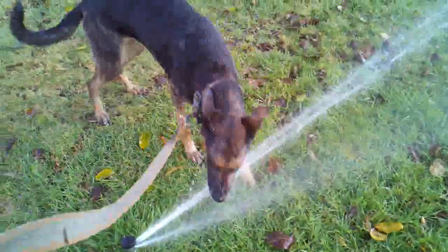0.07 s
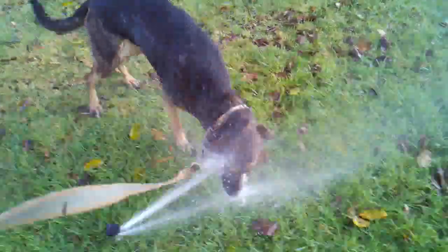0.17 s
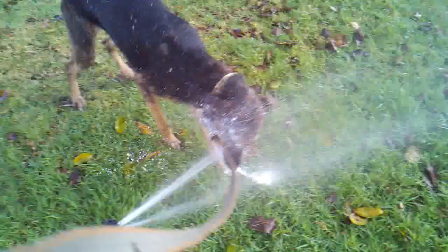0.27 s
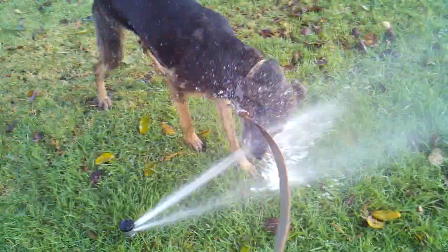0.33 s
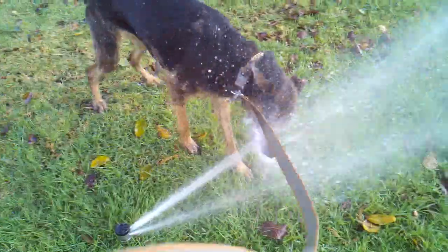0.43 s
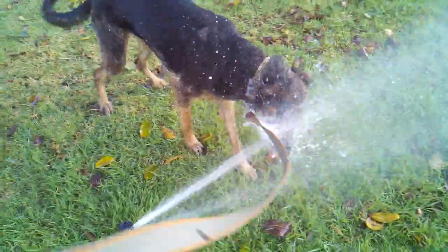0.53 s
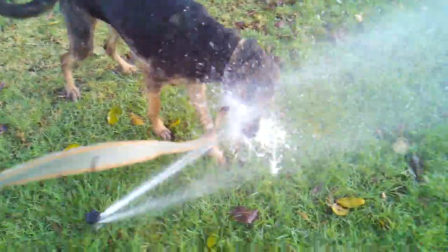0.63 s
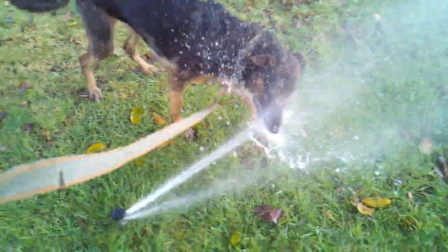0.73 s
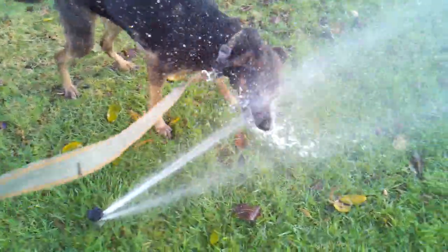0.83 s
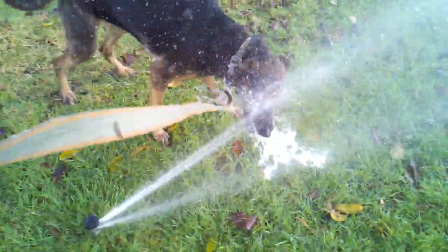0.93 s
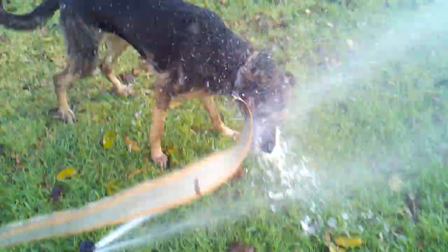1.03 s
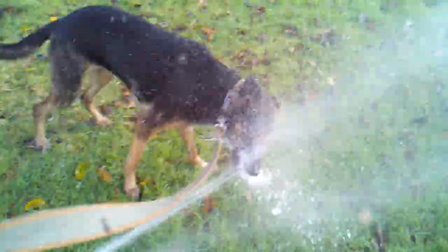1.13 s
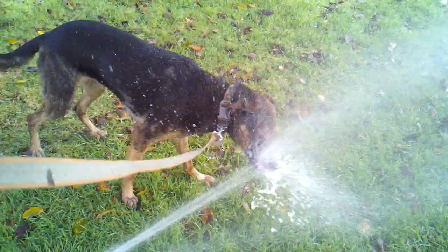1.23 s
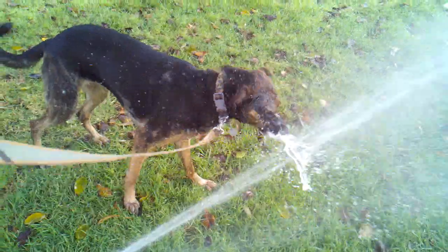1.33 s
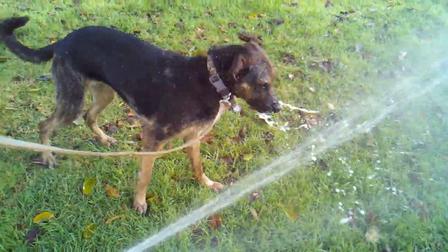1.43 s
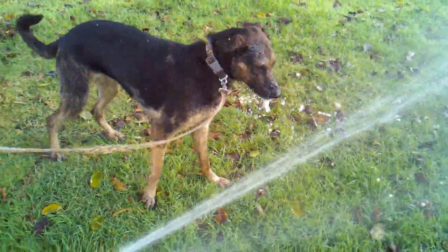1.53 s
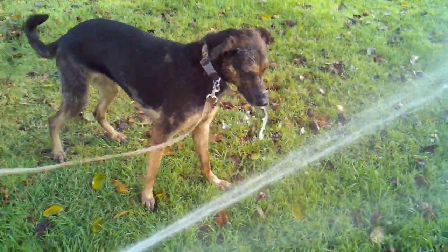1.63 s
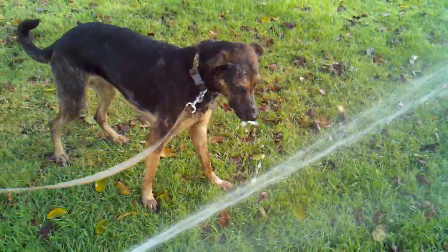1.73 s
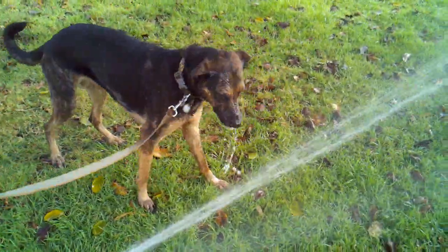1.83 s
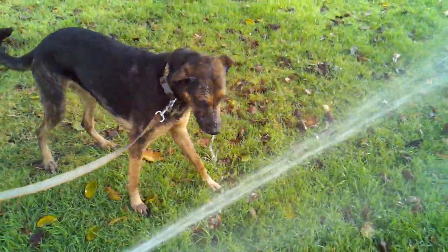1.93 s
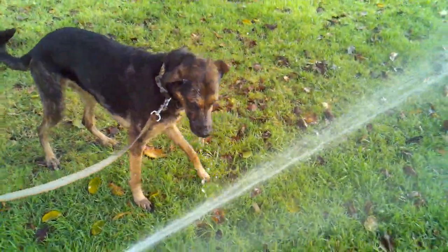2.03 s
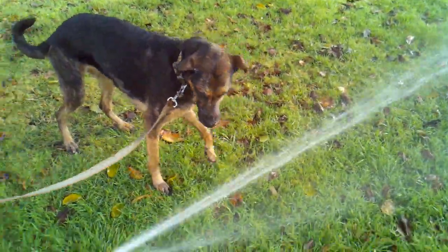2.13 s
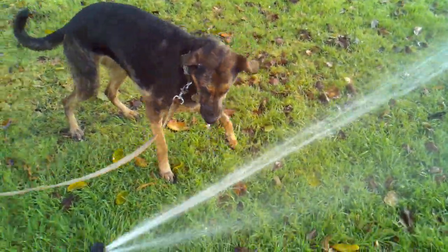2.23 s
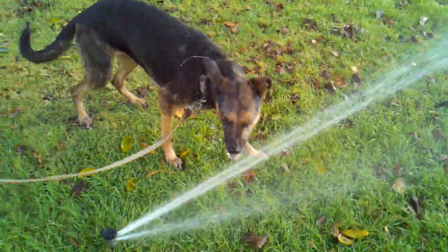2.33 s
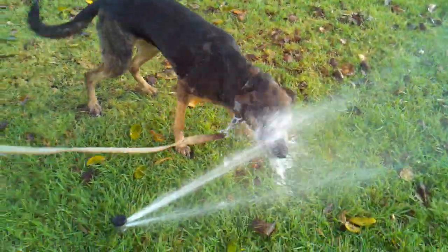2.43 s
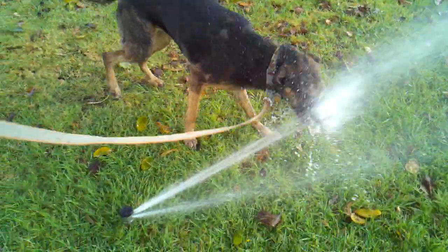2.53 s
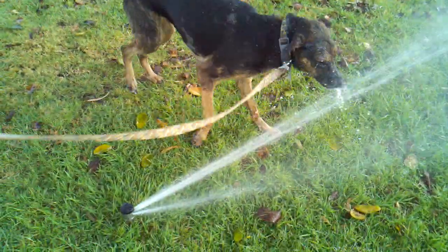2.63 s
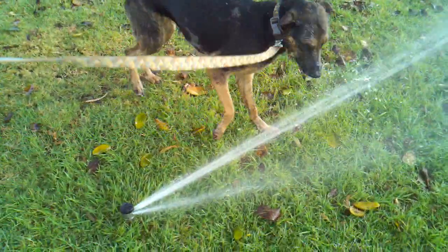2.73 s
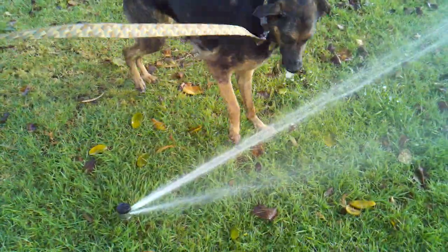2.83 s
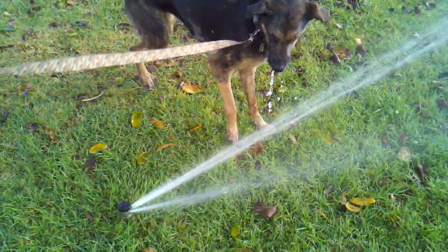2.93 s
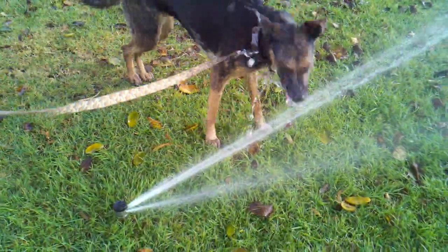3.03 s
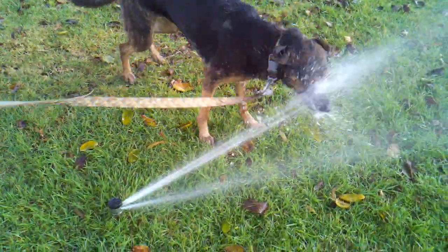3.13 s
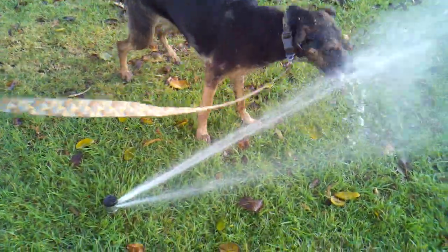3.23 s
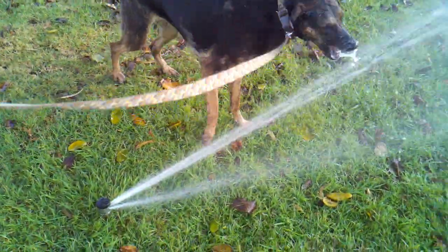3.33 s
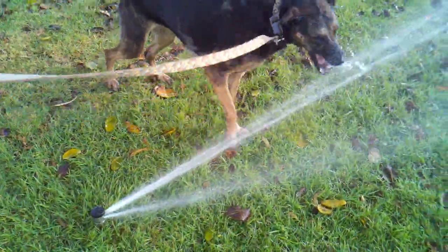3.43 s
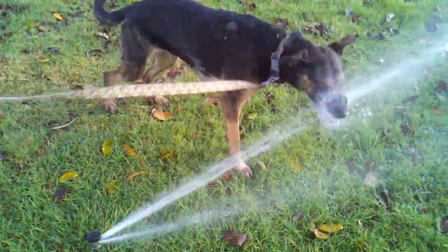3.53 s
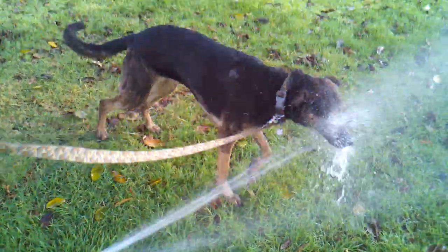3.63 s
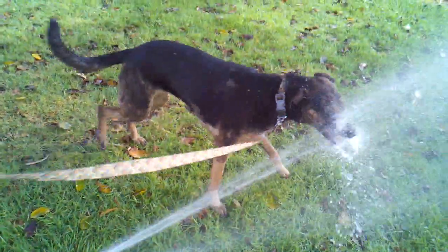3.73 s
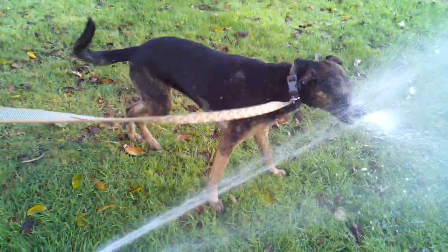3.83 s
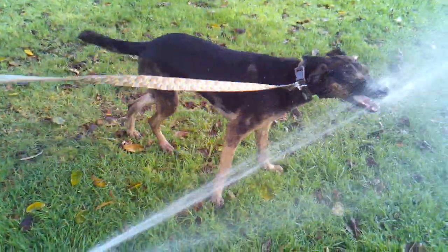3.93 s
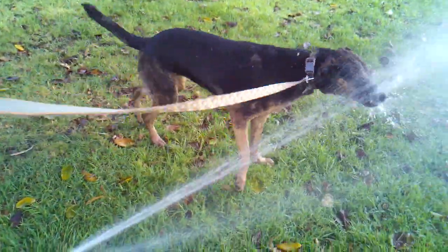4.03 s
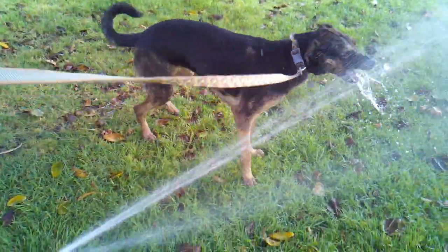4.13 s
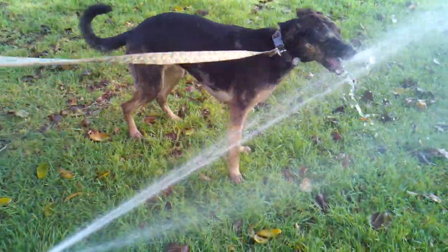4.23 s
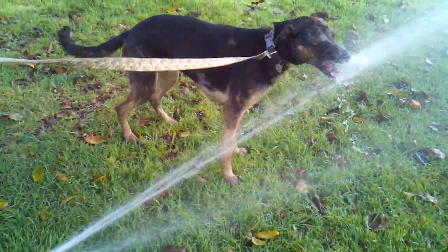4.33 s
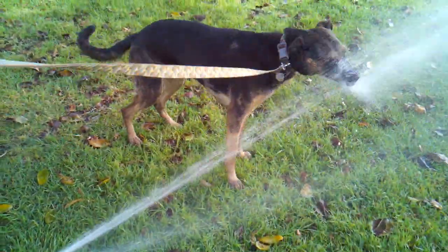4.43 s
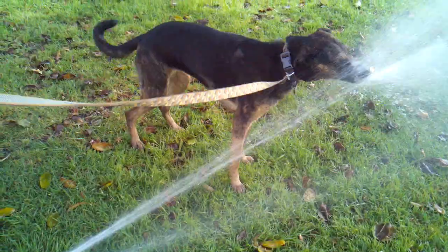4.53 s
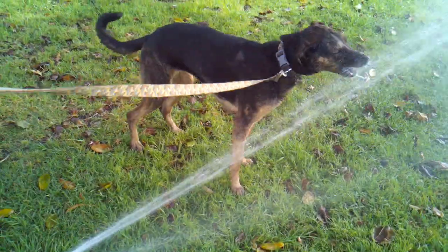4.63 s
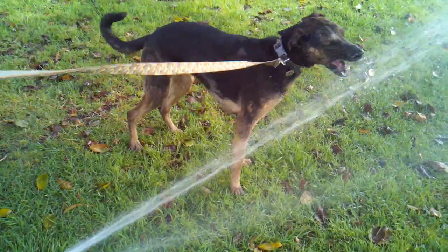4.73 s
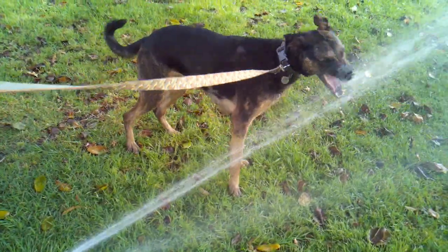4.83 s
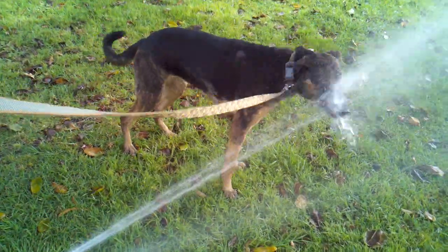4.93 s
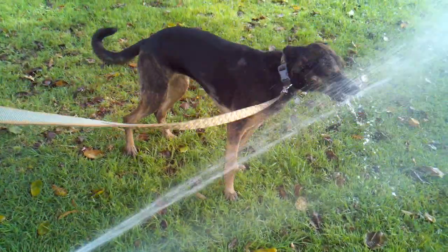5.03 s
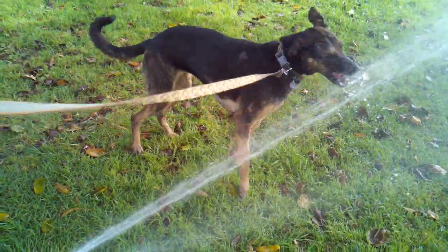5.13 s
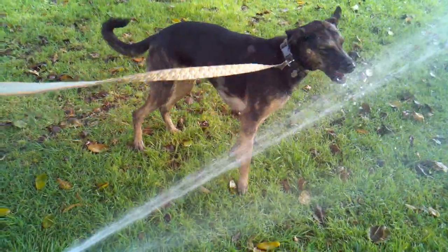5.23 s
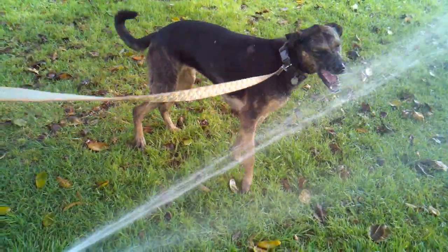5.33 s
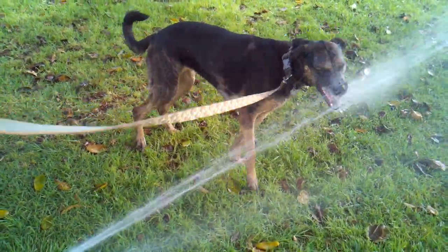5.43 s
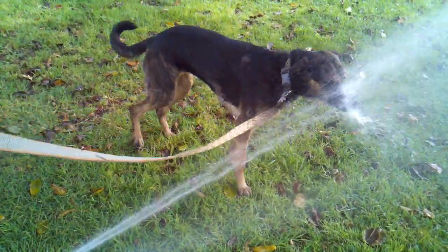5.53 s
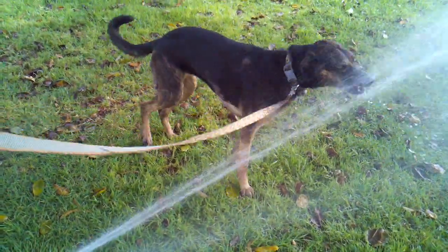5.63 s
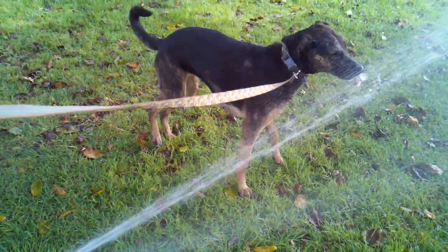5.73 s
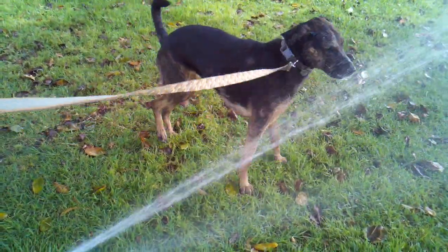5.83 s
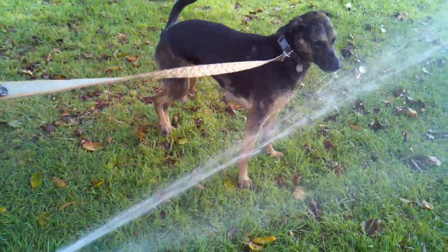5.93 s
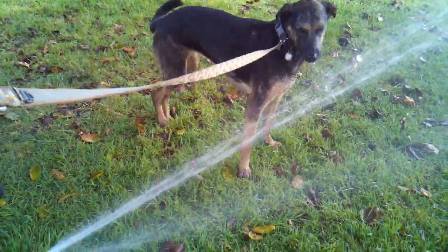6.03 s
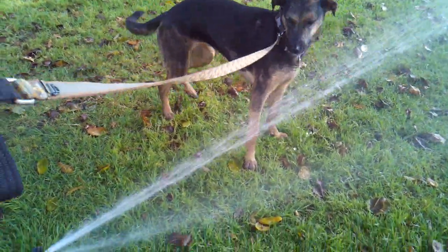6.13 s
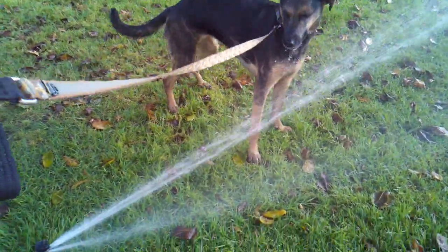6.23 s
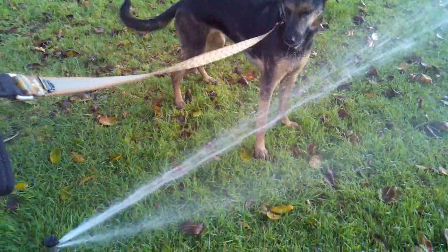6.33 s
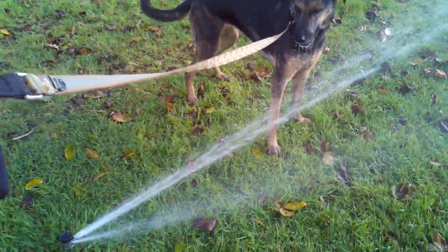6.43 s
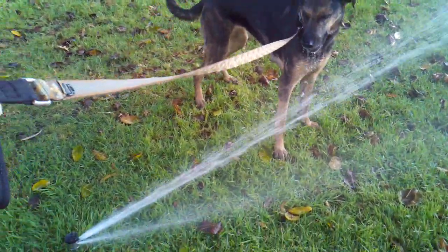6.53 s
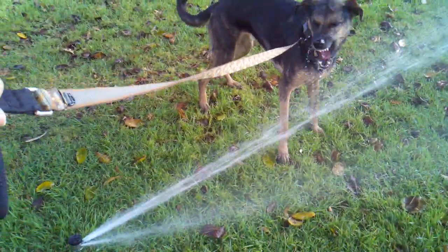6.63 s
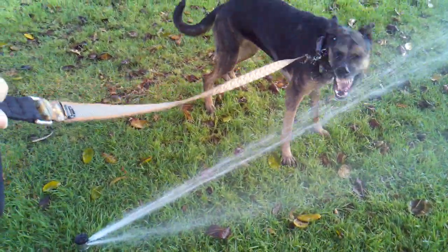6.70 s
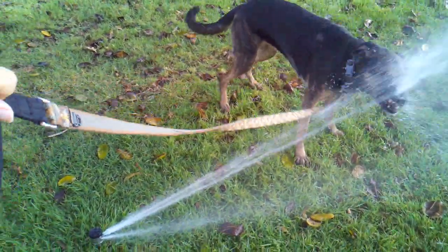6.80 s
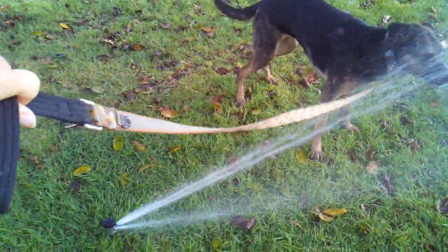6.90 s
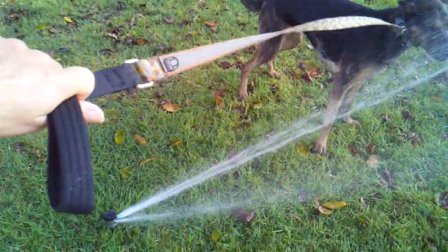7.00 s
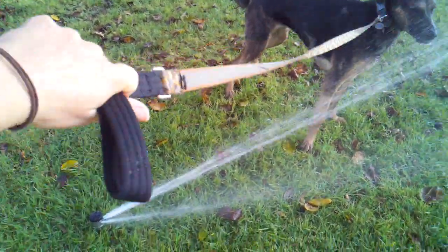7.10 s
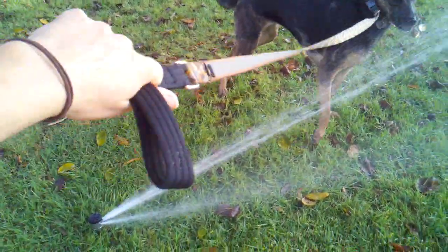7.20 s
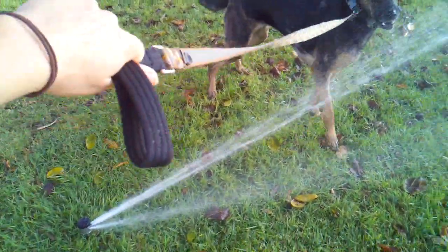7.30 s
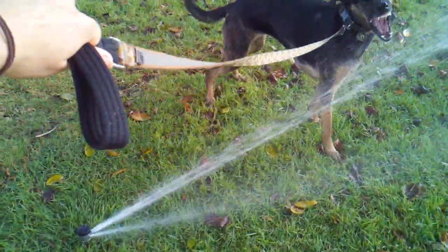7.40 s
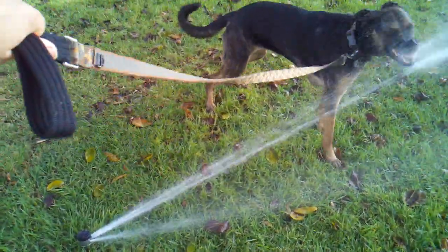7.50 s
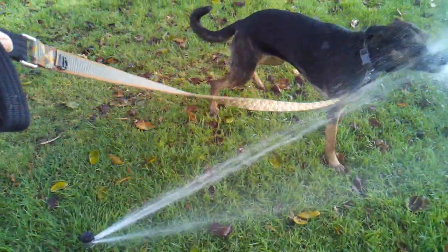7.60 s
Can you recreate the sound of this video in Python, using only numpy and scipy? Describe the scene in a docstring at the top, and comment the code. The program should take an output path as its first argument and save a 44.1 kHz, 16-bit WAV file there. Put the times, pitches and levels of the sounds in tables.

```python
"""A sprinkler jet swells into a hiss (shaped noise, whistle) as an engine (gliding firing tones) slows down.
At once a dog bites the jet, in a run to 1.4 s and again from 2.5 s: noise sprays, drops ring the mouth,
and gulps ring like trapped air. Bumps (short dull swings) hit the hand-held camera, mostly before 3.5 s
and near 7 s. From 1.2 s engines mostly gather speed; from 2.7 s fuzzy notes swell in the noise of traffic.
Two microphone ports hear all this; the camera subtracts each, delayed, from the other for stereo."""
import sys
import numpy as np
from scipy import signal
from scipy.fft import rfft, irfft, next_fast_len
from scipy.io import wavfile
from scipy.ndimage import uniform_filter1d

SR = 44100
rng = np.random.default_rng(int(sys.argv[2]) if len(sys.argv) > 2 else 0)


def unload_wav(signal):
    """Save mono or channel-first audio to the path in sys.argv[1] as 16-bit WAV at rate SR, clipped to [-1, 1]."""
    wavfile.write(
        sys.argv[1],
        SR,
        np.round(np.clip(np.atleast_2d(signal).T, -1, 1) * 32767).astype(np.int16),
    )


N = 337806  # length in samples

# Snaps of the jaws into the jet: [start t/s, hold t/s, spray level/dB as the hold begins, level/dB as it ends,
# gurgle over spray level/dB, mouth cavity f/Hz, extra level/dB of dull splat, extra level/dB of fine mist]
BITES = [(.172, 0.011, -38, -27.5, -13.5, 1100, 1.5, -1), (.225, 0.018, -33, -35, -6.5, 1400, 3, -7),
         (.262, 0.077, -29, -32.5, -14.5, 1000, 2, 0), (.372, 0.11, -31.5, -38.5, -13.5, 920, -0.5, -0.5),
         (.512, 0.041, -27, -30.5, -15.5, 1530, -2, -3), (.592, 0.058, -28.5, -32.5, -11.5, 1420, -0.5, -2),
         (.685, 0.085, -28.5, -29.5, -12.5, 1350, -1.5, -0.5), (.81, 0.088, -26.5, -30, -13, 1400, -3, -1),
         (.935, 0.062, -29, -29, -10, 1420, -2.5, -1), (1.03, 0.084, -30.5, -30, -10.5, 1390, 0.5, -0.5),
         (1.15, 0.075, -28, -26.5, -14, 1110, -4, 0.5), (1.27, 0.088, -30.5, -28.5, -14, 1180, 0, 3),
         (2.462, 0.13, -26, -23.5, -17, 1060, -1.5, 0.5), (2.632, 0.018, -26, -30, -33, 1060, -5, -3.5),
         (3.158, .13, -26, -22, -16.5, 1070, -0.5, -1), (3.63, 0.031, -21, -26.5, -20, 1070, -0.5, -0.5),
         (3.69, 0.25, -29, -27.5, -15.5, 1140, 0, -1.5), (4.02, 0.062, -31.5, -26, -21, 1210, 0.5, 2.5),
         (4.33, 0.16, -40, -41, -10, 944, 3.5, 4.5), (4.505, 0.11, -26, -28, -21, 920, -1, 0.5),
         (4.962, 0.082, -25, -24, -22, 1180, -1, 0), (5.54, 0.13, -23.5, -28.5, -18.5, 1030, -1, -0.5),
         (6.83, 0.034, -23.5, -21, -22, 960, -5, -0.5), (6.97, 0.063, -45, -41, 1, 870, 5.5, 1),
         (7.605, .06, -24.5, -25.5, -20, 880, 0, 0)]
# Water slapping shut a pocket of air in the mouth: [start t/s, level/dB, pitch f/Hz, 60 dB ring time t/s]
GULPS = [(0.231, -28, 1360, 0.068), (0.258, -25, 960, 0.042), (0.259, -27, 3460, 0.027),
         (0.26, -35, 2600, 0.018), (0.3, -26.5, 495, 0.026), (0.332, -34, 786, 0.093),
         (0.598, -30, 523, 0.016), (0.693, -35, 1340, 0.033), (0.706, -15, 600, 0.0084),
         (0.709, -20.5, 450, 0.02), (1.1555, -25, 2670, .012), (1.1665, -16.5, 616, 0.012),
         (1.171, -19, 440, 0.026), (2.551, -23, 590, 0.035), (2.646, -28, 530, 0.036),
         (3.264, -17.5, 3440, 0.022), (3.638, -16, 990, 0.013), (3.675, -18.5, 460, 0.024),
         (3.739, -17.5, 503, 0.022), (3.767, -26, 1420, 0.017), (3.85, -25, 920, 0.031),
         (3.922, -32, 700, .015), (3.856, -26, 510, .028), (4.057, -23, 1430, 0.033),
         (4.079, -28, 900, .02), (4.508, -20, 1030, 0.016), (4.56, -24, 960, 0.038),
         (4.571, -22, 895, 0.028), (4.609, -12, 764, 0.014), (4.985, -30, 1440, 0.065)]
# Knocks on the casing: [start t/s, level/dB, pitch f/Hz, share on the left port (0-1)]
BUMPS = [(0.271, -12, 268, 0.03), (0.291, -24, 220, 0.), (1.515, -26, 108, 1.), (1.964, -20.5, 177, 0.9),
         (2.27, -11.5, 205, 1.), (2.328, -16.5, 161, 1.), (2.382, -20, 180, 0.75), (3.239, -29, 90, 1.),
         (3.406, -23, 103, 1.), (6.669, -28, 130, 0.8), (6.958, -22, 154, 1.), (7.008, -24, 160, .9),
         (7.029, -17, 140, 0.8)]
# Steady pulls or coasts of an engine: [start t/s, end t/s, firing f/Hz at the start, f/Hz at the end, level/dB]
ENGINES = [(0.0, 0.62, 64.3, 45.2, -48), (1.15, 1.36, 43, 52, -50), (1.36, 2.3, 52.15, 68.2, -40.5),
           (2.305, 3.806, 68, 102.3, -43), (3.803, 4.304, 100, 114.6, -48.5), (4.3, 4.62, 115, 105, -45),
           (3.95, 5.251, 49, 100.4, -42), (5.258, 6.149, 100, 126.4, -41.5), (5.8, 6.08, 79, 66, -44),
           (6.077, 6.24, 66, 76.4, -42), (6.24, 6.7, 74.4, 71, -43), (6.75, 7.5, 78, 81.3, -47)]
# Engine orders: [multiple of the firing rate, level/dB]
ENGINE_ORDERS = [(1, 3), (2, -8), (3, -12)]
# Notes in the traffic: [start t/s, end t/s, pitch f/Hz, level/dB]
DRONES = [(5.3, 5.57, 456, -40.5), (6.612, 6.708, 600, -36), (2.7, 3.405, 363.5, -42.5),
          (2.79, 3.405, 393, -38.5), (3.997, 4.497, 225, -39), (6.098, 6.988, 454, -40.5),
          (6.3, 6.894, 133, -35.5), (6.993, 7.9, 289, -40), (7.192, 7.9, 474, -38)]
# Relative spectrum of passing traffic: [f/Hz, level/dB]
ROAD_SPECTRUM = [(25, -28), (45, -14), (80, -10), (150, 2.5), (250, -5), (480, -9), (650, -14.5),
                 (900, -18), (1300, -25.5), (2100, -30), (3500, -88), (8000, -71)]
# Relative spectrum of the far rumble: [f/Hz, level/dB]
RUMBLE_SPECTRUM = [(25, 2), (50, 1.5), (100, -10), (200, -30.5)]
# Relative spectrum of the free jet: [f/Hz, level/dB]
JET_SPECTRUM = [(300, -46), (1000, 0.5), (1900, -4), (2300, -3), (2900, -4.5), (3600, -4), (4300, -7),
                (5100, -5.5), (7000, 3), (8500, 5), (9800, 11.5), (11000, 7.5), (12300, 5.5), (13200, 10.5),
                (13900, 9.5), (15500, -7)]
# Relative spectrum of the spray at the jaws: [f/Hz, level/dB]
SPRAY_SPECTRUM = [(300, -7), (1000, -17), (2000, -5.5), (2700, -10.5), (3600, -6.5), (4300, -9),
                  (5100, -7.5), (5900, -4.5), (7100, -0.5), (8500, 2.5), (11000, 0), (13200, 0.5),
                  (13900, 2.5), (15500, -47)]
# Likeness of the two ports for a wide source: [f/Hz, correlation (-1 to 1)]
PORT_LIKENESS = [(60, .992), (300, .975), (500, .9), (700, .74), (1100, .4), (1600, .05), (2300, -.15),
                 (3100, -.1), (3800, .1), (14000, .02)]
# Share of the delayed other port taken off each side: [f/Hz, left share, right share]
PORT_CANCEL = [(4400, 1.0, 1.0), (5230, 0.5, 0.57), (6200, 0.078, 0.41), (8750, 0.04, 0.15),
               (14000, 0.033, 0.45)]
# The free jet, growing as the camera settles: [t/s, jet level/dB, nozzle whistle level/dB]
JET_LEVEL = [(0.0, -49, -64), (0.15, -40.5, -62), (1.3, -37, -52), (1.9, -36, -45), (3.1, -34.5, -43),
             (6.08, -34.5, -40), (6.53, -33.5, -34.5), (7.04, -34, -42), (7.4, -32.5, -42),
             (7.66, -32.5, -35)]
# Passing traffic: [t/s, level/dB]
ROAD_LEVEL = [(0.0, -50.5), (0.34, -42), (1.3, -37), (1.9, -36.5), (3.07, -30.5), (3.58, -36),
              (4.76, -31.5), (5.23, -34.5), (5.42, -31), (5.85, -33.5), (6.53, -28), (7.04, -30.5),
              (7.4, -27.5), (7.66, -28.5)]

RUMBLE_DB = -45
BITE_RISE_DB_PER_S, BITE_FALL_DB_PER_S = 580, 362
GURGLE_FADE_DB_PER_S = 21  # the mouth fills, and the gurgle sinks under the spray
UPPER_MOUTH_HZ = 3080  # second resonance of the mouth
DROPS_PER_S = 2500
SPATTER_PER_S, SPATTER_DB = 360, -25  # big drops bursting within the spray
SPLAT_UNDER_HZ, MIST_OVER_HZ = 4700, 8550
GULP_RISE = 0.048  # rise time as a share of the ring time
BUMP_CYCLES = 0.82  # cycles in which the decay factor falls to 1/e
PORT_DELAY_S = 1 / 2610
BAND_LIMIT_HZ = 13970


def gain_of(db):
    """Amplitude factor of a level in dB."""
    return 10 ** (np.asarray(db) / 20)


def evened(x):
    """Scales a sound to an RMS of 1 over all its channels."""
    return x / np.sqrt(np.mean(x ** 2) + 1e-20)


def read(points, hz, axis=1):
    """Reads a spectrum table, straight between points on a log frequency scale."""
    columns = np.transpose(points)
    return np.interp(np.log(hz + 1), np.log(columns[0] + 1), columns[axis])


def curve(rows, axis):
    """Draws a table column as straight automation over the whole scene."""
    columns = np.transpose(rows)
    return np.interp(np.arange(N) / SR, columns[0], columns[axis])


def add(mix, s, sound):
    """Lays a sound into the mix at s seconds, cut at the end."""
    part = mix[..., round(s * SR):][..., :sound.shape[-1]]
    part += sound[..., :part.shape[-1]]


def resonate(x, hz, width):
    """Shifts the curve hz down to zero, smooths, and shifts back: a resonance of gain 1, width in Hz."""
    turn = np.exp(2j * np.pi * np.cumsum(hz * np.ones(N)) / SR)
    r = np.exp(-np.pi * width / SR)
    return 2 * (turn * signal.lfilter([1 - r], [1, -r], x / turn)).real


def hiss(spectrum, right_lead_s, patchy_db, flicker_db, size, patch=(9, 11)):
    """Random short-time spectra at both ports, with drifting patches and a flicker shared by all bands."""
    # patch: extent of a patch in (bands, frames)
    frames, hz = 4 * N // size + 5, np.fft.rfftfreq(size, 1 / SR)
    a, b, c, d, patches = rng.standard_normal((frames, len(hz), 5)).T
    patches = uniform_filter1d(patches, size=patch[0], axis=0)
    patches = evened(uniform_filter1d(patches, size=patch[1], axis=1))
    flicker = evened(uniform_filter1d(rng.standard_normal(frames), size=3))

    # the right port hears a shared part, time-shifted, and a part of its own
    same = np.clip(read(PORT_LIKENESS, hz), -1, 1)[:, None]
    lead = np.exp(2j * np.pi * hz * right_lead_s)[:, None]
    left = a + 1j * b
    right = lead * same * left + np.sqrt(1 - same ** 2) * (c + 1j * d)

    level_db = read(spectrum, hz)[:, None] + patchy_db * patches + flicker_db * flicker
    ports = np.array([left, right]) * gain_of(level_db)
    return evened(signal.istft(ports, nperseg=size, noverlap=3 * size // 4)[1][:, :N])


def bites():
    """The jet breaks on teeth and tongue: spray, and drops of all sizes that ring the mouth cavity."""
    splat_gain, spray_gain, mist_gain, gurgle_gain = jaws()
    return (spray(splat_gain, spray_gain, mist_gain)
            + gurgle_gain * gurgle())


def jaws():
    """Strength of splat, spray, mist and gurgle through all bites: each rises steeply, holds and falls."""
    out, t = np.zeros((4, N)), np.arange(N) / SR
    for start, hold, first_db, last_db, gurgle_db, _, splat_db, mist_db in BITES:
        near = slice(round(max(start - .15, 0) * SR), round((start + hold + .2) * SR))
        since = t[near] - start
        held_db = np.interp(since, [0, hold], [first_db, last_db])
        rise_db = BITE_RISE_DB_PER_S * np.minimum(since, 0)
        fall_db = BITE_FALL_DB_PER_S * np.maximum(since - hold, 0)
        db = held_db + rise_db - fall_db
        wet_db = gurgle_db - GURGLE_FADE_DB_PER_S * (since - hold / 2)
        out[:, near] += gain_of([db + splat_db, db, db + mist_db, db + wet_db])
    return uniform_filter1d(out, size=300)


def spray(splat_gain, spray_gain, mist_gain):
    """Broken water as noise roughened by bursting drops, split into dull splat, spray and fine mist."""
    fizz = hiss(SPRAY_SPECTRUM, -0.00001, patchy_db=2.0, flicker_db=-0.5, size=256)
    burst_sizes = gain_of(3.8 * np.minimum(rng.exponential(1, N), 3))
    bursts = (rng.random(N) < SPATTER_PER_S / SR) * burst_sizes
    spatter = evened(signal.lfilter([1], [1, -np.exp(-1 / (0.00055 * SR))], bursts))
    fizz = evened(fizz * (1 + gain_of(SPATTER_DB) * spatter))

    low, below_mist = (signal.oaconvolve(fizz, signal.firwin(63, hz, fs=SR)[None], "same", axes=1)
                       for hz in (SPLAT_UNDER_HZ, MIST_OVER_HZ))
    return splat_gain * low + spray_gain * (below_mist - low) + mist_gain * (fizz - below_mist)


def gurgle():
    """Random drops strike the moving mouth cavity and excite its lower and upper resonances."""
    sizes = gain_of(1.33 * np.minimum(rng.exponential(1, (2, N)), 5))
    drops = sizes * (rng.random((2, N)) < DROPS_PER_S / SR)
    drops = drops * rng.standard_normal((2, N))
    drops[1] = 1.3 * np.roll(drops[0], 4) + 1.05 * drops[1]  # the dog stands slightly left

    mouth_hz = curve(BITES, axis=5)
    broad = resonate(resonate(drops, mouth_hz, 1200), mouth_hz, 1200)
    ringing = resonate(drops, mouth_hz, 150)
    upper = resonate(resonate(drops, UPPER_MOUTH_HZ, 630), UPPER_MOUTH_HZ, 630)
    return evened(broad + 0.33 * ringing + 0.89 * upper)


def gulps():
    """A slap of water, then ringing trapped air whose pitch drops as the jaws close round it."""
    out, t = np.zeros((2, N)), np.arange(3000) / SR
    noises = rng.standard_normal((len(GULPS), len(t)))
    for (s, db, hz, t60), noise in zip(GULPS, noises):
        bent_t = t + 0.00027 * (1 - np.exp(-t / 0.0042))  # runs fast at first: the pitch drop
        rise = (1 - np.exp(-t / (GULP_RISE * t60))) ** 2
        ring = np.sin(2 * np.pi * hz * bent_t) * rise * gain_of(-60 * t / t60)
        # an overtone near twice the pitch, fading faster than the ring
        overtone = 0.26 * np.sin(2 * np.pi * 1.98 * hz * t) * gain_of(-130 * t / t60)
        slap = uniform_filter1d(noise, size=18) * gain_of(-5 - 60 * t / t60)
        heard = gain_of(db) * (ring + overtone + slap)
        add(out, s, np.array([heard, np.roll(heard, 3)]))  # reaches the left port first
    return out


def jet():
    """The stream tears the air at the nozzle, with a fuzzy whistle near the top."""
    whistle = rng.standard_normal((2, N))
    for _ in range(2):
        whistle = resonate(whistle, 12000, 700)
    body = hiss(JET_SPECTRUM, 0, patchy_db=1.8, flicker_db=0.2, size=512)
    return (gain_of(curve(JET_LEVEL, axis=1)) * body
            + gain_of(curve(JET_LEVEL, axis=2)) * evened(whistle))


def bumps():
    """A short dull swing of the casing, shared between the ports and mostly strong on one."""
    out, t = np.zeros((2, N)), np.arange(4000) / SR
    for s, db, hz, left in BUMPS:
        u = hz * t / BUMP_CYCLES
        swing = np.sin(2 * np.pi * hz * t) * u ** 0.54 * np.exp(1 - u)
        left = np.clip(left, 0, 1)
        add(out, s, gain_of(db) * swing * np.array([[left], [1 - left]]))
    return out


def engines():
    """Firing tones that glide evenly and waver a little, with a stack of weaker orders above them."""
    out, t = np.zeros(N), np.arange(N) / SR
    for start, stop, from_hz, to_hz, level_db in ENGINES:
        wobble = evened(uniform_filter1d(rng.standard_normal(N), size=6000))
        firing_hz = np.interp(t, [start, stop], [from_hz, to_hz]) * (1 + .015 * wobble)
        turns = np.cumsum(firing_hz) / SR
        tone = sum(gain_of(db) * np.sin(2 * np.pi * order * turns) for order, db in ENGINE_ORDERS)
        waver = evened(uniform_filter1d(rng.standard_normal(N), size=4000))
        span = uniform_filter1d(1. * ((t > start) & (t < stop)), size=3500)  # soft ends
        out += np.sqrt(2) * tone * span * gain_of(level_db + 1.44 * waver)
    return np.array([out, np.roll(out, -8)])  # the right port is nearer the street


def drones():
    """Fuzzy notes, noise through a narrow resonance, that swell out of the traffic and fade again."""
    out, t = np.zeros(N), np.arange(N) / SR
    for start, stop, hz, db in DRONES:
        swell = np.sin(np.pi * np.clip((t - start) / (stop - start), 0, 1))
        out += gain_of(db) * swell * evened(resonate(rng.standard_normal(N), hz, 11.6))
    return np.array([out, np.roll(out, -6)])  # reaches the right port first


def road():
    """Tyres and wind of passing traffic, off to the right, over a steady far rumble."""
    far = hiss(RUMBLE_SPECTRUM, 0, patchy_db=2.5, flicker_db=1.0, size=2048)
    # patches narrow in pitch and long in time, as tyres drone
    passing = hiss(ROAD_SPECTRUM, 0.000084, patchy_db=2.0, flicker_db=0.6, size=2048, patch=(2, 30))
    return gain_of(RUMBLE_DB) * far + gain_of(curve(ROAD_LEVEL, axis=1)) * passing


def scene():
    """Sums all the sources at the two ports."""
    return bites() + gulps() + jet() + bumps() + engines() + drones() + road()


def record(dry):
    """The right port is a little weaker; delay-and-subtract combs the middle and sides; then the band limit."""
    size = next_fast_len(N + 4096)
    hz, (left, right) = np.fft.rfftfreq(size, 1 / SR), rfft(dry, size)
    low_cut = 1 / np.sqrt(1 + (50 / (hz + 1)) ** 4)
    mismatch = np.exp((1j * .18 - .2) / (1 + hz / 2500))  # the capsules differ most in the bass
    left, right = left * low_cut, right * low_cut * mismatch

    late = np.exp(-2j * np.pi * hz * PORT_DELAY_S)
    off_left, off_right = (np.clip(read(PORT_CANCEL, hz, axis=k), 0, 1) for k in (1, 2))
    stereo = np.array([left - off_left * late * right, right - off_right * late * left])
    pair = irfft(stereo, size)[:, :N]
    band_limit = signal.firwin(2047, BAND_LIMIT_HZ, window=("kaiser", 10), fs=SR)
    return signal.oaconvolve(pair, band_limit[None], "same", axes=1)


dry = scene()
out = record(dry)
unload_wav(out)
```